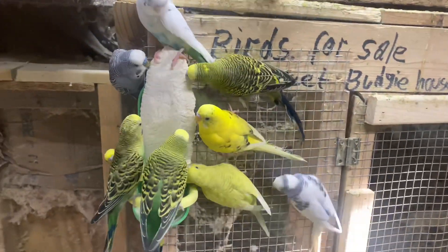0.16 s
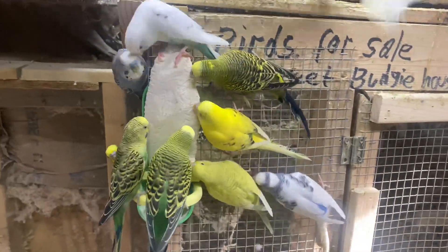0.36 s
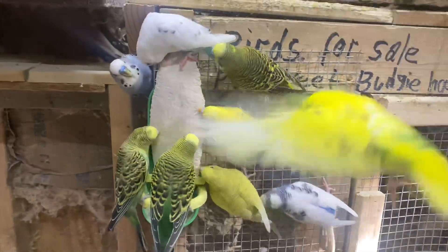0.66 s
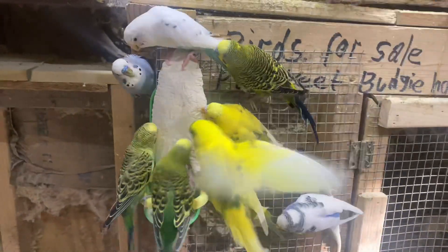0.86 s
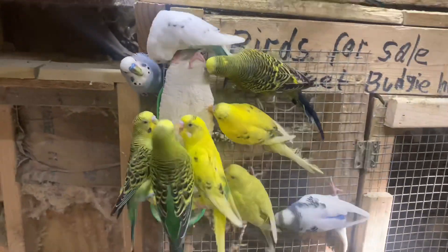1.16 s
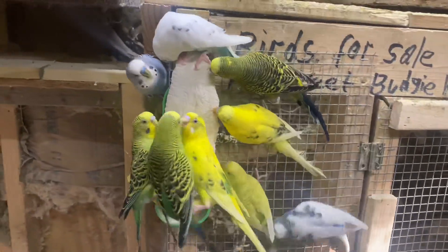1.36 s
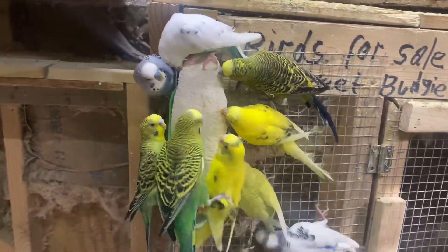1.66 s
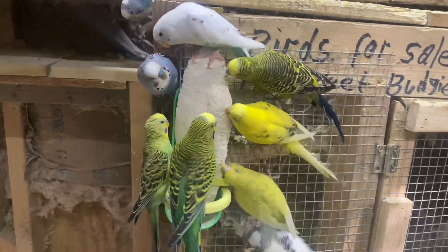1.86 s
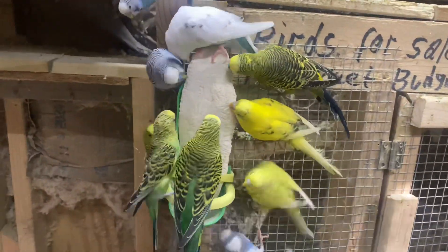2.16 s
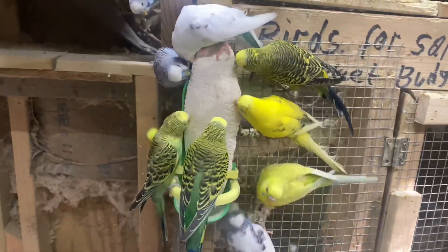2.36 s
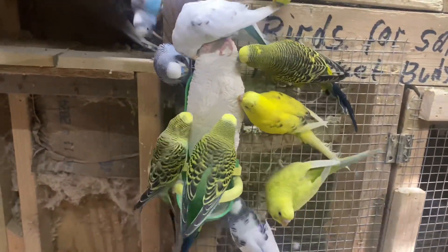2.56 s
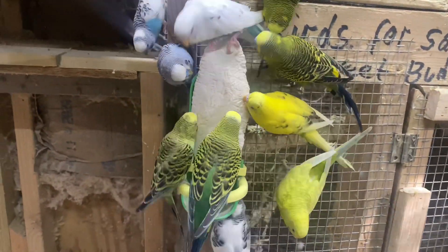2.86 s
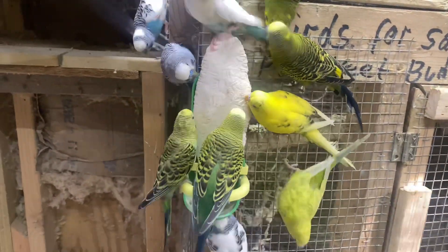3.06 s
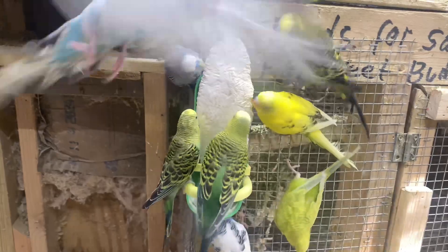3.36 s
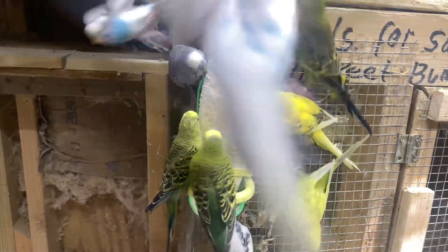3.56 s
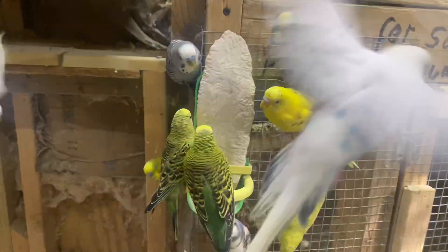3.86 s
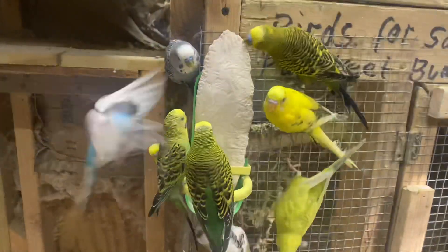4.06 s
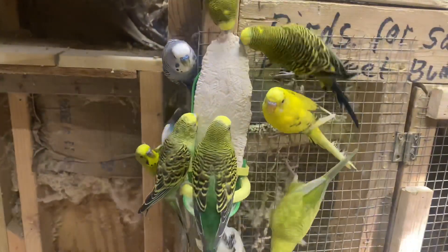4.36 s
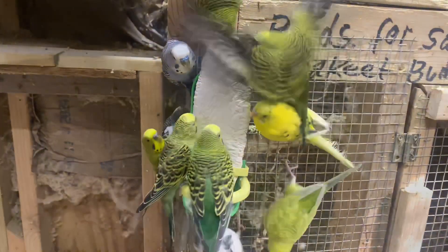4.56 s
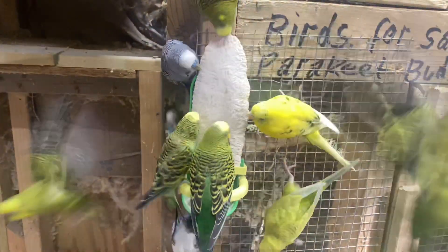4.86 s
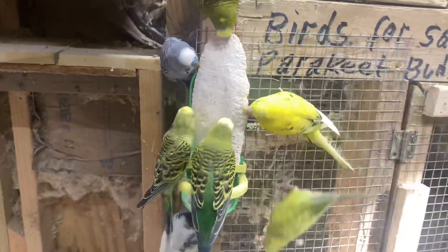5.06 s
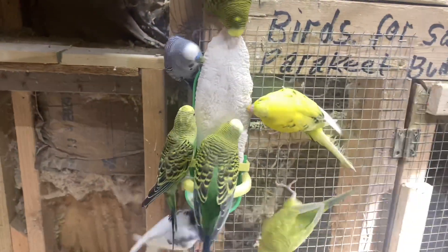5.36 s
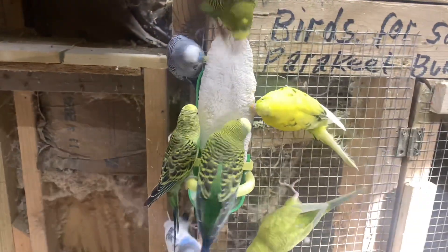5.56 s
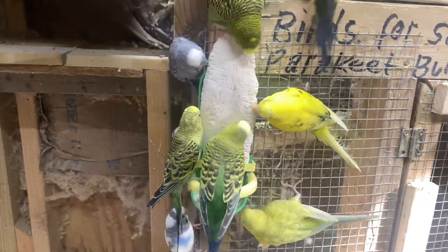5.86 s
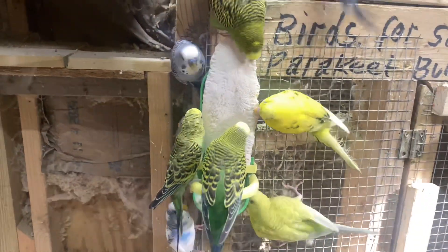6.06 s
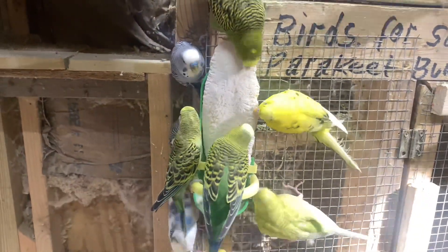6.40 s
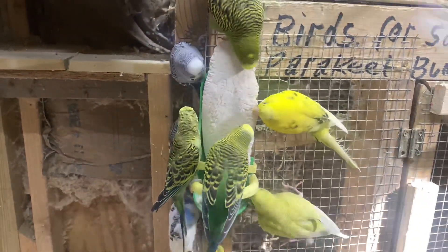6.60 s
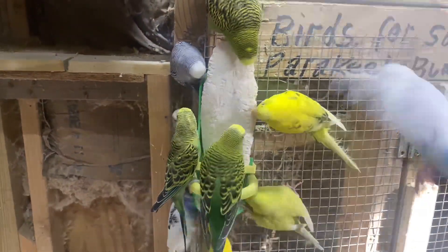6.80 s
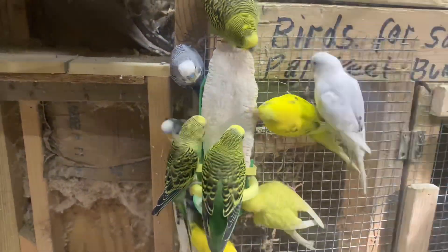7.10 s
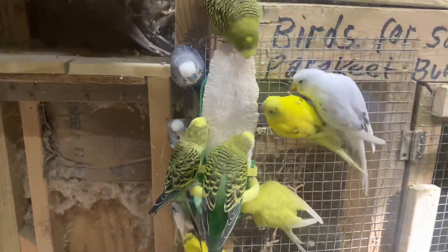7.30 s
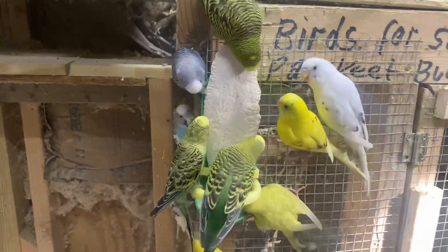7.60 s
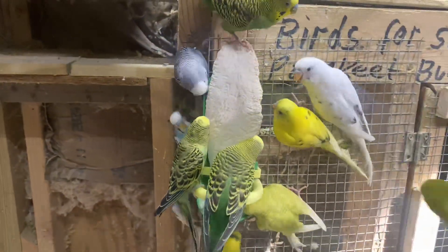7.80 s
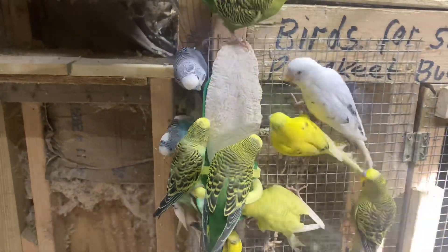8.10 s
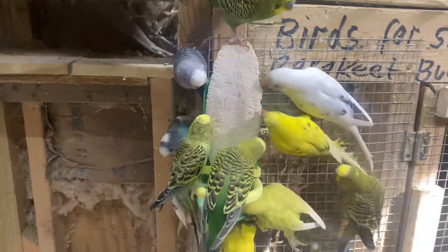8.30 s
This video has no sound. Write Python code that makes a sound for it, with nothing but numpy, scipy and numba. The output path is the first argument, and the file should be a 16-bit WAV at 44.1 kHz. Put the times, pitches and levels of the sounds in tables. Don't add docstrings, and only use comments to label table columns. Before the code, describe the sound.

Many small parrots chatter without pause in a small plank-walled aviary. One close bird repeats a quick falling whistle about every three quarters of a second, others answer with short chirps and raspy screeches. Around the middle, birds fly past close stereo microphones with heavy low wing thumps and feathery puffs, then rapid rising flicks and throaty grumbles follow. Small bright beak ticks and a low room rumble sit underneath.

```python
import sys
import numpy as np
from scipy import signal
from scipy.fft import rfft, irfft
from scipy.io import wavfile
from scipy.ndimage import uniform_filter1d
from numba import njit

SR = 44100
rng = np.random.default_rng(int(sys.argv[2]) if len(sys.argv) > 2 else 0)


def invert_db(x):
    u = np.asarray(x, float) / 20
    return 10 ** u


def inscribe(sig):
    pcm = np.round(np.clip(np.atleast_2d(sig).T, -1, 1) * 32767)
    wavfile.write(sys.argv[1], SR, pcm.astype(np.int16))


N = 372204


def rms_one(x):
    return x / np.sqrt(np.mean(x ** 2) + 1e-20)


def drift(rate):
    knots = rng.standard_normal(int(N / SR * 400) + 2)
    return np.interp(np.arange(N) / SR * rate, np.arange(len(knots)), knots) * 1.22


def add(track, s, sound):
    i = max(round(s * SR), 0)
    track[i:i + len(sound)] += sound[:max(N - i, 0)]


def evenly(first, last, count):
    return np.linspace(first, last, max(round(count), 1))


def band_filter(x, order, hz, kind):
    return signal.sosfilt(signal.butter(order, hz, kind, fs=SR, output="sos"), x)


@njit
def resonate(x, hz, r):
    y = np.zeros(len(x))
    for i in range(2, len(x)):
        drive = (1 - r * r) / 2 * (x[i] - x[i - 2])
        y[i] = drive + 2 * r * np.cos(2 * np.pi * hz[i] / SR) * y[i - 1] - r * r * y[i - 2]
    return y


def whistles(notes, warble_db, waver_hz, overtone_db):
    out = np.zeros(N)
    swell = invert_db(warble_db * drift(130))
    waver = waver_hz * drift(390)
    for s, length, start_hz, end_hz, db in notes:
        i = round(s * SR)
        size = min(max(round(length * SR), 64), N - i)
        hz = np.linspace(start_hz, end_hz, size) + waver[i:i + size]
        phase = 2 * np.pi * np.cumsum(hz) / SR
        shape = signal.windows.tukey(size, min(0.009 / length, 1))
        tone = np.sin(phase) + invert_db(overtone_db) * np.sin(2 * phase)
        add(out, s, 1.064 * invert_db(db) * shape * tone)
    return out * swell


def repeat(steps, calls):
    notes = []
    for s, db, fade_db, stretch in calls:
        for delay, length, start_hz, end_hz, step_db in steps:
            faded_db = db + step_db + fade_db * delay / steps[-1][0]
            notes.append((s + delay * stretch, length * stretch, start_hz, end_hz, faded_db))
    return notes


# delay [s], length [s], pitch at start [Hz],
# pitch at end [Hz], level [dB].
FALLING_STEPS = [(0, .03, 3700, 3660, -3), (.033, .03, 3420, 3120, -2), (.062, .03, 3080, 3030, -6),
                 (.097, .057, 3020, 2920, -2), (.138, .026, 3050, 2990, -5)]
# start [s], level [dB], fade over the call [dB], tempo stretch [ratio].
FALLING_TIMES = [(0.076, -19, -1, 0.95), (.7, -17, -4, 0.99), (1.438, -22, -2, 0.96),
                 (2.235, -20, -1, 0.97), (2.922, -23.5, 5.5, 1.01), (4.505, -20, -2, 0.95),
                 (5.19, -19, -2, 1.0), (6.016, -19, 1, 0.93), (6.804, -19, -1, 0.99),
                 (7.606, -18, -4, 0.92)]


def falling_caller():
    return whistles(repeat(FALLING_STEPS, FALLING_TIMES), warble_db=3.5, waver_hz=60, overtone_db=-28)


# delay [s], length [s], pitch at start [Hz], pitch at end [Hz],
# level [dB].
RISING_STEPS = [
    (0, .03, 2100, 2450, -8),
    (.03, .04, 2470, 2620, 0),
    (.07, .035, 2600, 2800, -4),
]
# start [s], level [dB], fade over the call [dB],
# tempo stretch [ratio].
RISING_TIMES = [
    (.435, -30, 0, 1.1),
    (2.562, -29, 1, .85),
    (5.5, -26, -3, .9),
]
# start [s], length [s], pitch at start [Hz], pitch at end [Hz], level [dB].
SINGLE_WHISTLES = [(8.392, 0.06, 2310, 2550, -29.5), (1.794, 0.072, 1465, 2120, -38),
                   (2.628, 0.031, 2950, 3020, -25), (2.792, 0.015, 3180, 3200, -23),
                   (2.842, 0.023, 2880, 2910, -13.5), (2.867, 0.055, 3840, 3710, -18),
                   (2.872, 0.019, 7670, 7600, -34), (3.426, 0.024, 2900, 2900, -32),
                   (3.487, 0.073, 1590, 1666, -43), (3.667, 0.094, 3610, 3960, -23.5),
                   (3.825, 0.058, 3680, 3500, -31.5), (4.75, 0.012, 2940, 2840, -25),
                   (4.77, 0.067, 3503, 3590, -21.5), (4.865, 0.048, 3460, 3380, -28.5),
                   (4.942, 0.047, 6820, 6650, -35.5), (5.005, 0.042, 3120, 3430, -26),
                   (5.259, 0.094, 3803, 3800, -21), (5.48, 0.058, 6450, 6570, -35),
                   (5.485, 0.087, 1596, 1670, -40), (6.553, 0.032, 3520, 3590, -20),
                   (7.569, 0.022, 4500, 4190, -18.5), (7.737, 0.03, 2750, 2610, -22),
                   (7.92, 0.048, 2400, 2930, -25), (8.036, 0.042, 2860, 3000, -24),
                   (4.322, .02, 7000, 7000, -31), (4.49, 0.018, 2700, 2800, -32),
                   (4.519, .016, 2890, 2800, -25.5), (4.54, 0.011, 3280, 3230, -13.5),
                   (4.84, 0.017, 2840, 2850, -22), (5.25, 0.0085, 3070, 3040, -16.5),
                   (5.275, 0.014, 4800, 4610, -22), (6.06, 0.018, 3343, 3150, -13.5),
                   (6.818, 0.011, 3550, 3500, -25), (6.99, 0.045, 2840, 2840, -28),
                   (7.712, .03, 4414, 4500, -21), (7.863, .018, 3340, 2960, -20.5),
                   (7.971, 0.027, 5100, 5420, -24.5), (8.135, 0.019, 7080, 7000, -33.5),
                   (8.297, .1, 2640, 3550, -30), (8.179, 0.051, 2533, 2456, -28.5)]


def answering_birds():
    notes = repeat(RISING_STEPS, RISING_TIMES) + list(SINGLE_WHISTLES)
    return whistles(notes, warble_db=4, waver_hz=65, overtone_db=-28)


# start [s], length [s], level [dB], throat share [dB].
SCREECHES = [(0.0, 0.082, -31, -9), (0.153, 0.13, -33, -2.5), (0.408, 0.15, -36, 2),
             (0.577, .15, -33.5, -12), (0.764, 0.32, -33, -7.5), (1.066, 0.2, -33, -6.5),
             (1.302, 0.23, -39, 0.5), (1.492, 0.13, -36.5, 2), (1.648, 0.16, -38.5, -9),
             (1.881, 0.071, -37.5, 2), (2.43, 0.1, -38, -1), (2.63, 0.034, -36, -2), (2.906, 0.075, -29, 2),
             (3.085, 0.073, -31, -6.5), (3.302, 0.088, -29.5, -5), (3.502, 0.076, -32, -4),
             (3.675, 0.082, -33.5, 2), (3.839, 0.089, -34.5, 1.5), (4.028, 0.23, -33, -4),
             (4.269, 0.089, -31, -5), (4.392, 0.033, -35.5, -25), (4.452, 0.022, -36, -17),
             (4.631, 0.05, -35.5, 2), (5.011, 0.096, -41, 5.5), (5.829, 0.029, -37.5, -2),
             (5.873, 0.13, -38.5, 2), (6.315, 0.09, -31.5, -3), (6.492, 0.11, -32.5, -6),
             (6.697, 0.099, -34.5, -10), (7.781, 0.067, -38.5, -13)]
# start [s], length [s], throat level [dB],
# throat over head [dB].
THROATY_GRUMBLES = [(1.956, 0.093, -37, 9), (2.2, 0.19, -34, 10), (2.702, 0.075, -37.5, 10),
                    (3.436, 0.014, -26.5, 8), (4.513, 0.11, -33.5, 3), (4.725, 0.09, -36, 11),
                    (4.818, 0.15, -36, 16), (4.946, 0.11, -36, 11), (5.213, 0.071, -29, 8),
                    (5.284, 0.082, -37.5, 2), (5.45, 0.18, -38.5, 15), (5.687, 0.013, -32, 5),
                    (6.058, 0.037, -27, 7.5), (6.186, 0.16, -39, 10), (6.795, 0.044, -28, 14),
                    (6.853, 0.029, -29.5, 5), (7.001, 0.055, -41, -4), (7.078, 0.017, -29.5, 2),
                    (7.138, 0.021, -35.5, -3), (7.207, 0.094, -32, 10), (7.314, 0.075, -35, 4.5),
                    (7.438, 0.055, -31, 13), (7.54, 0.2, -32.5, 6), (7.706, 0.071, -33.5, 7),
                    (7.854, 0.056, -30.5, 30), (7.937, 0.077, -31, 7.5), (8.015, 0.15, -30, 18.5),
                    (8.122, 0.13, -43, 5), (8.228, 0.053, -37.5, 1.5), (8.347, 0.08, -35, 15)]
# pitch [Hz], width [Hz], level [dB].
THROAT_HOLLOWS = [
    (1650, 110, -1),
    (2450, 260, -3),
    (3050, 240, 1),
    (3700, 300, 0),
]
# pitch [Hz], width [Hz], level [dB].
HEAD_HOLLOWS = [
    (6190, 3500, -16.5),
    (10350, 260, -21),
]


def squawks(pulse_hz=180, jitter=0.32, rasp=0.8):
    cycle = np.cumsum(pulse_hz * np.exp(jitter * drift(60)) / SR)
    strength = invert_db(5.16 * rng.standard_normal(N // 8).clip(-3, 1.5))[cycle.astype(int)]
    breath = rng.standard_normal(N) * (rasp + strength * np.exp(-3.0 * (cycle % 1)))

    rows = []
    for s, length, db, share_db in SCREECHES:
        beak_hz = 5686 + 86 * (db + 30) + 2.4 * s
        rows.append((s, length, db, beak_hz, share_db))
    for s, length, db, share_db in THROATY_GRUMBLES:
        rows.append((s, length, db - share_db, 5130, share_db))

    high, low, beak = np.full(N, invert_db(-64.0)), np.zeros(N), np.full(N, 6000.)
    climb_per_s = 1.05
    for s, length, db, hz, throat_db in sorted(rows):
        u = np.linspace(0, 1, round((length + 0.014) * SR))
        shape = np.minimum(u * length / 0.014, 1) * np.cos(np.pi / 2 * u ** 2.45)
        add(high, s + .006, invert_db(db) * shape)
        add(low, s + .006, invert_db(db + throat_db) * shape)
        i = round(s * SR)
        beak[i:i + len(u)] = (hz * (1 + climb_per_s * length * (u - .5)))[:N - i]

    def ring(hz, width_hz):
        return resonate(breath, hz * np.exp(0.074 * drift(30)), np.exp(-np.pi * width_hz / SR))

    head = ring(uniform_filter1d(beak, size=300), 520)
    for hz, width_hz, db in HEAD_HOLLOWS:
        head += invert_db(db) * ring(hz, width_hz)
    throat = np.zeros(N)
    for k, (hz, width_hz, db) in enumerate(THROAT_HOLLOWS):
        throat += (-1) ** k * invert_db(db) * ring(hz, width_hz)
    head = band_filter(head, 2, [3900, 14000], "band")
    throat = band_filter(throat, 2, [1400, 4600], "band")
    high = high * invert_db(2 * drift(40))
    low = low * invert_db(3 * drift(35))
    return invert_db(5.5) * high * rms_one(head) + invert_db(2.5) * low * rms_one(throat)


# first [s], last [s], how many, peak [dB], top pitch [Hz].
FAR_FLICK_TRAINS = [(.632, .785, 3, -41, 1700), (.896, .957, 2, -43, 1500), (.934, 1.212, 5, -39, 1550),
                    (1.28, 1.459, 4, -38, 1700), (1.51, 1.724, 5, -39, 1900), (1.782, 1.905, 2, -38, 2200),
                    (4.052, 4.108, 2, -38, 1500), (7.59, 7.59, 1, -38, 2400), (7.738, 7.756, 2, -36, 2300),
                    (7.915, 7.982, 2, -39, 1500), (8.15, 8.216, 2, -36, 1500)]
# time [s], peak [dB], top pitch [Hz],
# octave level [dB].
CLOSE_FLICKS = [(4.016, -44.5, 2590, -31), (4.227, -35, 2600, -36), (4.25, -38, 2000, -38),
                (4.287, -36, 2420, -28), (4.3, -35, 2140, -25), (4.349, -34.5, 2480, -27),
                (4.412, -39.5, 2670, -27.5), (4.471, -37, 2500, -31), (4.536, -33, 2460, -29),
                (4.59, -34, 2420, -30), (4.665, -36, 2460, -26.5), (4.74, -37, 2320, -27),
                (4.826, -37, 2400, -35), (4.894, -45, 2180, -33), (4.96, -43, 2230, -29),
                (5.048, -40, 2270, -31), (5.116, -33.5, 2330, -27.5), (5.197, -35, 2275, -27),
                (5.293, -38, 2530, -30), (7.085, -61, 2370, -29), (7.113, -39, 2100, -27),
                (7.162, -30.5, 2480, -25.5), (7.211, -31, 2580, -21), (7.266, -32, 2490, -23),
                (7.288, -30.5, 2580, -30.5), (7.325, -31.5, 2430, -25.5), (7.372, -37, 2510, -28),
                (7.394, -34, 2370, -28), (7.456, -38, 2370, -25), (8.083, -29, 2550, -26),
                (8.158, -33, 2970, -38), (1.78, -42, 2420, -27.5), (1.917, -38, 2260, -38),
                (3.195, -47, 2420, -28.5), (3.452, -40, 2530, -38), (3.945, -37, 1860, -30),
                (5.34, -40.5, 2470, -27), (5.7, -46, 2280, -35), (7.022, -42, 2710, -29),
                (7.562, -38, 2384, -17)]


def flicks(length_s=.017, low_hz=850):
    rows = list(CLOSE_FLICKS)
    for first, last, count, db, top_hz in FAR_FLICK_TRAINS:
        for s in evenly(first, last, count):
            rows.append((s, db - 4, top_hz, -14 + .5 * db))
    out = np.zeros(N)
    vary = rng.standard_normal((len(rows), 4))
    for (s, db, top_hz, octave_db), (stretch, reach, force, bloom) in zip(rows, vary):
        u = np.linspace(0, 1, round(length_s * np.exp(.1 * stretch) * SR))
        hz = low_hz + (top_hz * np.exp(.02 * reach) - low_hz) * (1 - (1 - u) ** 2.2)
        phase = 2 * np.pi * np.cumsum(hz) / SR
        mouth = .3 + np.exp(-((2 * hz - 4900) / 900) ** 2)
        overtones = mouth * np.sin(2 * phase) + invert_db(-8) * np.sin(3 * phase)
        tone = invert_db(db - 1 + 2 * force) * np.sin(phase) + invert_db(octave_db + bloom) * overtones
        add(out, s - .003, signal.windows.tukey(len(u), .4) * tone)
    return out * invert_db(3.5 * drift(350))


# first [s], last [s], how many, peak of first [dB], peak of last [dB].
WING_BURSTS = [(.362, .362, 1, -30, -30), (.54, .797, 6, -27, -23), (1.178, 1.178, 1, -28, -28),
               (3.338, 3.338, 1, -24, -24), (3.396, 3.505, 3, -14, -18), (3.574, 3.617, 2, -25, -19),
               (3.676, 3.734, 2, -15, -21), (3.778, 3.778, 1, -14, -14), (3.845, 4.018, 4, -14, -21),
               (4.086, 4.369, 6, -22, -27), (4.492, 4.581, 2, -27, -23), (4.811, 4.917, 3, -20, -19),
               (4.957, 5.017, 2, -19, -28), (5.096, 5.172, 3, -26, -26), (5.419, 5.483, 2, -26, -28),
               (6.509, 6.509, 1, -25, -25), (6.572, 6.729, 4, -17, -25), (6.784, 6.784, 1, -22, -22),
               (6.853, 6.884, 2, -22, -23), (7.609, 7.644, 2, -27, -28), (7.692, 7.797, 3, -24, -27)]
# time [s], peak [dB], pitch [Hz].
FAR_PUFFS = [(.042, -35, 303), (3.15, -46, 480), (3.24, -46, 490), (4.68, -39.5, 500), (5.461, -39.5, 473),
             (5.6, -44, 476), (6.711, -36, 490), (6.796, -31, 583), (3.2, -46, 480), (3.27, -44, 480),
             (3.49, -43, 547), (3.545, -47, 520)]


def wings(stroke_hz=64, rise_s=0.0036, fall_s=0.0064):
    strokes = []
    for first, last, count, first_db, last_db in WING_BURSTS:
        strokes += zip(evenly(first, last, count), evenly(first_db, last_db, count))
    chance = rng.standard_normal((len(strokes), 3))
    t = np.arange(-2000, 2000) / SR
    shape = np.exp(-.5 * (t / np.where(t < .003, rise_s, fall_s)) ** 2)

    push, puffs = np.zeros(N), list(FAR_PUFFS)
    for (s, db), (louder, higher, faster) in zip(strokes, chance):
        puffs.append((s - .019, -42 + 0.6 * (db + 19) + 2.5 * louder, 490 * np.exp(0.12 * higher)))
        slowing_t = t - 11.0 * t * np.abs(t).clip(0, .03)
        swing = np.cos(2 * np.pi * stroke_hz * np.exp(0.28 * faster) * slowing_t)
        add(push, s + t[0], -invert_db(db) * shape * swing)

    puff = np.zeros(N)
    puff_shape = np.exp(-.5 * ((t[2000:] - .012) / 0.004) ** 2)
    for (s, db, hz), air in zip(puffs, rng.standard_normal((len(puffs), 2000))):
        rung = rms_one(resonate(air, np.full(2000, float(hz)), np.exp(-np.pi * 140 / SR)))
        add(puff, s - .004, invert_db(db + 7.0) * rung * puff_shape)

    stir = uniform_filter1d(np.abs(push), size=4000)
    eddies = band_filter(rng.standard_normal((3, N)), 1, [70, 260], "band")
    eddies = rms_one(eddies[0] + 0.85 * eddies[1:])
    late_push = np.array([np.roll(push, 640), np.roll(push, 800)])
    air = push + invert_db(-3) * late_push + invert_db(-10.5) * stir * eddies
    air = band_filter(air, 2, 31, "high")
    return air + aviary(puff, -30, wet_db=.6, t60=.08) * invert_db([[-2], [2]])


# time [s], peak [dB].
BRIGHT_TICKS = [(0.7776, -36.5), (2.6394, -37), (3.459, -36), (4.0058, -33), (4.401, -25), (5.1761, -30),
                (5.465, -26.5), (5.8294, -39), (6.9492, -32), (7.0494, -42)]


def ticks():
    out, t = np.zeros(N), np.arange(400) / SR
    for (s, db), air in zip(BRIGHT_TICKS, rng.standard_normal((len(BRIGHT_TICKS), 400))):
        add(out, s, invert_db(db - 1.0) * air * np.exp(-t / 0.0046))
    return band_filter(out, 2, 6000, "high")


# time [s], level [dB].
CHORUS_LEVEL = [(0.0, -34), (0.3, -37.5), (0.65, -29.5), (1.03, -25.5), (1.43, -33), (2.0, -37),
                (2.94, -25.5), (3.5, -33.5), (4.58, -43), (4.75, -40), (5.3, -33), (5.9, -35.5),
                (6.28, -33), (6.6, -34), (6.95, -29.5), (7.5, -26), (7.95, -34), (8.44, -28)]


def chorus(count=3200):
    draw = rng.standard_normal((count, 4))
    start = np.sort(rng.random(count)) * (N / SR - .01)
    length = .015 * np.exp(.4 * draw[:, 1])
    start_hz = np.clip(3000 * np.exp(.14 * draw[:, 0]), 1400, 3900)
    end_hz = start_hz * np.exp(.07 * draw[:, 2])
    notes = np.c_[start, length, start_hz, end_hz, 2.2 * draw[:, 3]]
    crowd = rms_one(whistles(notes, warble_db=3, waver_hz=110, overtone_db=-24))
    s, db = np.transpose(CHORUS_LEVEL)
    level_db = np.interp(np.arange(N) / SR, s, db) - 5 + 1.4 * drift(12)
    return invert_db(level_db) * crowd


# start [s], length [s], change in level [dB].
QUIET_MOMENTS = [(0.336, 0.077, -2.5), (1.822, 0.042, -5), (2.053, 0.091, -1.5), (2.4, 0.038, -3),
                 (3.559, 0.092, -8), (3.99, 0.02, -7), (4.389, 0.025, -5), (4.705, 0.029, -1),
                 (5.155, 0.048, -1), (5.859, 0.18, -6.5), (6.441, 0.052, 0.5), (7.19, 0.022, 2.5),
                 (7.498, 0.048, 2), (7.89, .05, -0.5)]


def flock_hush():
    hush_db = np.zeros(N)
    for s, length, db in QUIET_MOMENTS:
        add(hush_db, s, db * signal.windows.tukey(round(length * SR), .4))
    return invert_db(hush_db)


# pitch [Hz], level [dB per Hz].
ROOM_COLOUR = [(18, -40), (30, -39), (75, -6.5), (709, -18.5), (3400, -7), (9190, -23.5), (11300, -26.5),
               (15500, -30)]


def room_tone(level_db=-35):
    hz = np.maximum(np.fft.rfftfreq(N, 1 / SR), 1)
    colour_hz, colour_db = np.transpose(ROOM_COLOUR)
    colour = invert_db(np.interp(np.log(hz), np.log(colour_hz), colour_db))
    boom = invert_db(24.5) / (1 + ((hz - 54) / 6) ** 2)
    hollow = invert_db(-6.0) / (1 + ((hz - 480) / 60) ** 2)
    colour *= 1 + boom + hollow
    alike = 0.9 / (1 + (hz / 320) ** 2)
    mid, side = rfft(rng.standard_normal((2, N)))
    both = np.sqrt(1 + alike) * mid + np.sqrt(1 - alike) * side * [[1], [-1]]
    return invert_db(level_db + drift(2.808) + drift(26)) * rms_one(irfft(colour * both, N))


def aviary(x, lag, wet_db, t60):
    t = np.arange(int(.3 * SR)) / SR
    tails = rng.standard_normal((2, len(t))) * invert_db(-60 * t / t60) * (t > .002)
    tails *= invert_db(wet_db) / np.sqrt(np.sum(tails ** 2, axis=1, keepdims=True))
    tails[0, max(lag, 0)] += 1
    tails[1, max(-lag, 0)] += 1
    paths = rfft(tails, 2 * len(t))
    colour = np.sqrt(uniform_filter1d(np.abs(paths) ** 2, size=12))
    tails = irfft(paths * np.sqrt(np.mean(colour ** 2)) / colour)[:, :len(t)]
    return signal.fftconvolve(x[None], tails, axes=1)[:, :N] / np.sqrt(1 + invert_db(2 * wet_db))


def scene():
    hush = flock_hush()
    birds = aviary(falling_caller(), 15, wet_db=-4, t60=.09) * invert_db([[3], [2]])
    birds += aviary(answering_birds(), -4, wet_db=-3, t60=.08) * invert_db([[3.5], [2.5]])
    birds += aviary(squawks(), 13, wet_db=-1.5, t60=.08) * invert_db(3)
    birds += aviary(flicks(), 3, wet_db=-4, t60=.05) * invert_db(5)
    birds += aviary(chorus() * hush, -11, wet_db=3, t60=.1) * invert_db(3)
    return birds + wings() + ticks() + room_tone() * hush


# low edge [Hz], high edge [Hz],
# threshold against the masking sound [dB], threshold against both signals together [dB].
WEAK_BANDS = [
    (7900, 10000, -18, -6.5),
    (10000, 12400, -28, -3.8),
    (12400, 13900, -21, -2.8),
    (13900, 15800, -16.5, -2.5),
    (15800, 18000, 10, 0),
]


def empty_weak_treble(frames, hz):
    def level(band):
        return np.sqrt(np.sum(np.abs(frames[:, band]) ** 2, axis=1, keepdims=True))

    def both(band):
        return np.hypot(*level(band))

    masker = .05 * both(hz > 5000) ** .6
    treble = both(hz > 9000)
    sudden = treble > invert_db(7) * np.roll(treble, 1)
    for low_hz, high_hz, threshold_db, share_db in WEAK_BANDS:
        bins = np.flatnonzero((hz >= low_hz) & (hz < high_hz))
        for band in np.array_split(bins, len(bins) // 11):
            floor = np.maximum(masker * invert_db(threshold_db), both(band) * invert_db(share_db))
            chance = invert_db(2 * rng.standard_normal((2,) + masker.shape))
            frames[:, band] *= (level(band) > floor * chance) | (sudden & (share_db < 0))
    return frames


def band_limit(x):
    return signal.sosfilt(signal.butter(12, 16550, fs=SR, output="sos"), x)


def record(dry):
    hz, _, (left, right) = signal.stft(dry, SR, nperseg=1536)
    alike = (.93 / (1 + (8300 / (hz + 1)) ** 12))[:, None]
    lag_s, in_step_hz = .000256, 11170
    turn = np.exp(2j * np.pi * lag_s * (hz - in_step_hz))[:, None]
    right = np.sqrt(1 - alike ** 2) * right + alike * left * turn
    frames = empty_weak_treble(np.array([left + right, left - right]), hz)
    mid, side = signal.istft(frames, SR, nperseg=1536)[1][:, :N] / 2
    return band_limit(np.array([mid + side, mid - side]))


dry = scene()
out = record(dry)
inscribe(out)
```